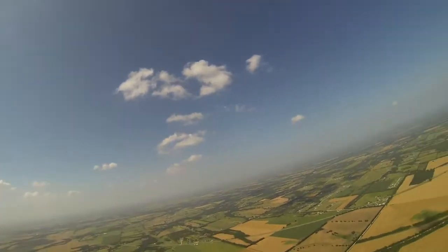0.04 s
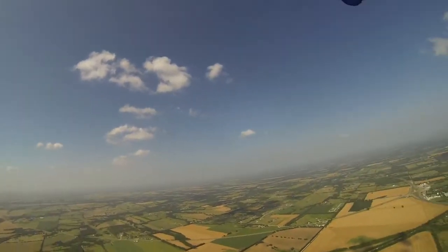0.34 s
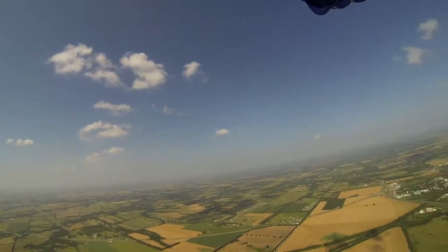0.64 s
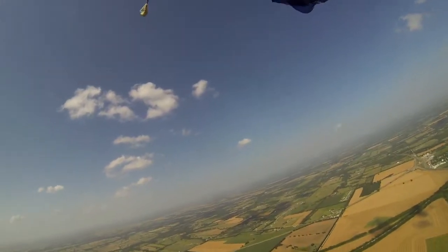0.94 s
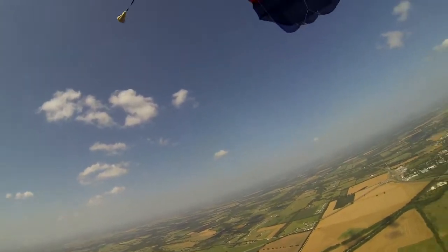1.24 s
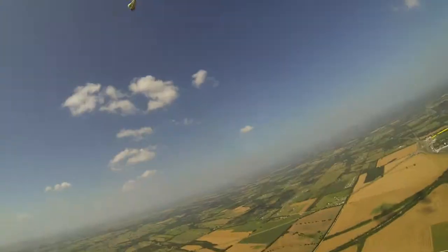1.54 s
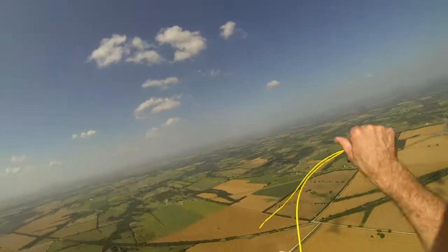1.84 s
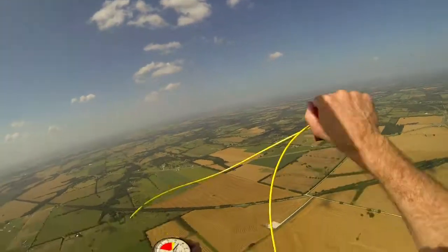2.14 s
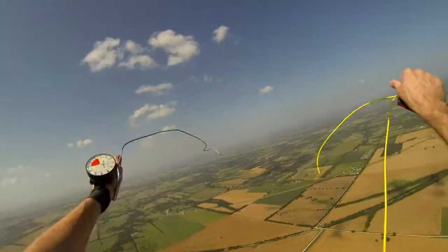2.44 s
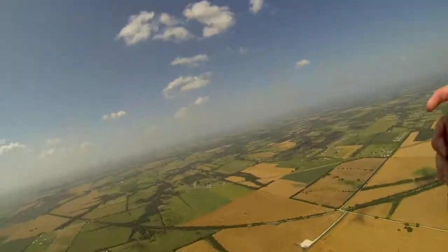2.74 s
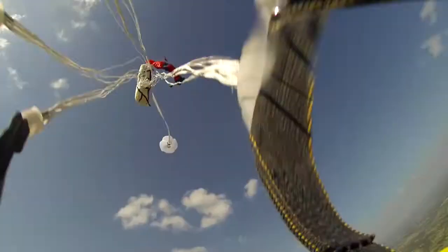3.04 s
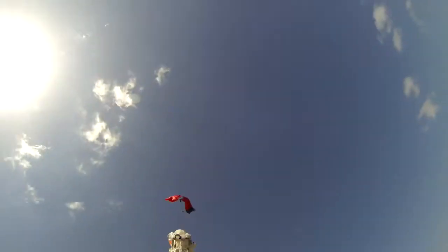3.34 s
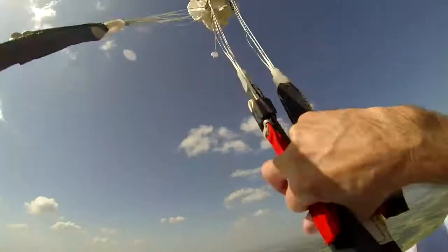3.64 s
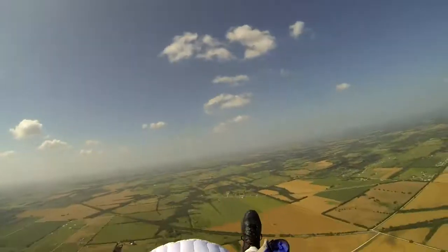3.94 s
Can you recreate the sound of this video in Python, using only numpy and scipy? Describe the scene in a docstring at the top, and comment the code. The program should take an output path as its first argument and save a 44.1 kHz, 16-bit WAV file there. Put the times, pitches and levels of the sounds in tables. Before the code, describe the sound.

Wind buffets a skydiver's microphone in uneven gusts over a low hum. Straps and cables snap sharply and cloth rustles as one parachute is cut away, then a quick run of cracks comes as the next opens.

```python
"""Wind on a skydiver's camera

One parachute is cut away and the next opens. Turbulent air buffets the housing and drives its mount
into a hum; cloth flaps and rustles; straps, cables and rings strike with short cracks. The hollow
case colours the wind, rustles and cracks by resonance, and the hardest snaps overload the microphone."""
import sys
import numpy as np
from scipy import signal
from scipy.fft import rfft, irfft
from scipy.io import wavfile
from scipy.ndimage import uniform_filter1d

SR = 44100
rng = np.random.default_rng(int(sys.argv[2]) if len(sys.argv) > 2 else 0)


def bounce(signal):
    """Save signal as a 16-bit WAV file at the path given by the first command-line argument."""
    frames = np.transpose(np.atleast_2d(signal))
    limited = np.clip(frames, -1, 1)
    pcm = np.round(limited * 32767).astype(np.int16)
    wavfile.write(sys.argv[1], SR, pcm)


N = 176400
TIME = np.arange(N) / SR

# resonances of the hollow case: f/Hz, lift/dB
CASE_MODES = [(665, 5), (865, 4.5), (1290, 4), (1490, 4), (2100, 0), (2520, 3.5), (3400, 5), (3850, 9.5),
              (4950, 6.5), (6480, 3), (10360, 4.5)]
# course of the airflow, in relative levels: t/s, buffeting/dB, rush/dB, hiss/dB
AIRFLOW = [(0, -29.5, -31.5, -37.5), (0.13, -41.5, -43.5, -52.5), (0.3, -49, -49.5, -58),
           (0.55, -34, -31, -47.5), (0.61, -46.5, -56.5, -57.5), (0.82, -32, -31, -36),
           (0.96, -32.5, -36.5, -47), (1.13, -30.5, -27.5, -32.5), (1.215, -17, -33, -33.5),
           (1.29, -96, -54, -91), (1.42, -24.5, -62, -39), (1.47, -65, -72, -74), (1.75, -53, -60.5, -64.5),
           (1.79, -44.5, -47.5, -51), (2.06, -36.5, -48, -50.5), (2.15, -26, -41.5, -42.5),
           (2.22, -49, -57.5, -57.5), (2.38, -35, -43, -48), (2.45, -64, -72.5, -70), (2.84, -39, -43, -50),
           (2.91, -37, -51.5, -57), (3.03, -37.5, -43, -44.5), (3.27, -39, -47, -54),
           (3.55, -32, -41.5, -49), (3.7, -29, -31.5, -43.5), (4.0, -38.5, -41, -40.5)]
# spectra of the four bands of wind noise: f/Hz, relative density/dB
RUMBLE_SPECTRUM = [(12, 3.5), (40, 2.5), (80, -5), (180, -24), (700, -75)]
BUFFET_SPECTRUM = [(60, -21), (160, 4.5), (280, 2), (700, -12), (1100, -21.5), (5000, -68)]
RUSH_SPECTRUM = [(300, -31), (800, -14), (1250, 3), (1680, 1), (3000, -40.5), (15000, -58)]
HISS_SPECTRUM = [(800, -17.5), (1800, 3.5), (3700, -11), (4500, -18), (10500, -34.5), (15000, -43)]
# vibration of the mount driven by the air: t/s, level/dB
MOUNT_HUM = [(.78, -28), (.93, -17), (1.2, -30.5), (1.76, -28.5), (2.0, -18.5), (2.19, -12), (2.25, -32.5),
             (2.37, -13.5), (2.43, -36), (2.58, -30.5), (2.78, -19.5), (2.92, -17), (3.13, -31.5),
             (3.28, -18.5)]
# jerks of the harness that set the mount ringing: t/s, level/dB
HARNESS_JERKS = [(1.243, -12), (1.452, -15), (2.418, -13)]
# fabric, cables and lines rubbing: start t/s, level/dB, duration/s
RUBS = [(0.528, -43.5, 0.034), (0.791, -28, 0.008), (1.151, -36.5, 0.099), (1.414, -43.5, 0.024),
        (1.784, -51, 0.093), (2.059, -46.5, 0.014), (2.111, -43, 0.065), (2.201, -39.5, 0.0079),
        (2.281, -48.5, 0.02), (2.879, -38, 0.011), (3.426, -42.5, 0.047), (3.673, -39, 0.08)]
# spectrum of popping creases: f/Hz, relative density/dB
CREASE_SPECTRUM = [(400, -1.5), (2900, 0), (5000, -16), (10500, -24.5), (15000, -32.5)]
# flaps of loose cloth: centre t/s, level/dB, f/Hz, Gaussian width/s
CLOTH_FLAPS = [(1.207, -18.5, 1610, 0.019), (1.221, -5.5, 266, 0.0029), (1.414, -11, 91, 0.0096),
               (2.149, -25.5, 378, 0.0033), (3.702, -21.5, 285, 0.019), (3.772, -28.5, 1460, 0.0031),
               (3.857, -20.5, 483, 0.0064), (3.963, -28.5, 1350, 0.013)]
# vortices hitting the microphone: t/s, signed peak pressure/full scale, time constant/s
VORTICES = [(0.0664, -0.46, 0.0028), (0.089, 0.73, 0.009), (0.266, -0.91, 0.0054), (0.554, -1.08, 0.0037),
            (1.221, -1.65, 0.0017), (1.429, -0.33, 0.0011), (1.434, 0.9, 0.0031), (2.403, 1.5, 0.0022),
            (2.411, -0.77, 0.0021), (2.89, 0.59, 0.0033)]
# knocks on a piece of hardware, perhaps a harness ring: t/s, level/dB
HARDWARE_KNOCKS = [(3.0815, -28.5), (3.1346, -30.5)]
# impacts of straps, cables and rings: t/s, level/dB, decay/s, treble shelf/dB, resonance f/Hz
IMPACTS = [(.0657, 8.5, 0.00079, -6, 1204), (0.1094, -19, 0.0017, -12, 1610),
           (0.1657, -21.5, 0.0014, -31, 1710), (0.2653, -19, 0.0019, -6.5, 1310),
           (0.579, -20, 0.0084, -4, 1650), (0.6741, -24.5, 0.0019, 19, 3430),
           (1.2251, 9.5, 0.0021, -2, 1710), (1.2552, -5, 0.0029, -6.5, 850),
           (1.3315, -22.5, 0.0032, -5.5, 2740), (1.394, -25.5, 0.0024, -5, 2100),
           (1.506, -36.5, 0.001, -9.5, 2480), (1.538, -34.5, 0.0019, -6, 2486),
           (1.84, -14.5, 0.0036, -4, 2207), (1.9522, -17, 0.0029, -10.5, 2210),
           (1.9626, -7.5, 0.0027, -13.5, 2480), (2.402, -4, 0.00018, -9, 400),
           (2.811, -25, 0.0021, -13, 2290), (2.926, -21, 0.0022, -8.5, 2300),
           (2.9423, -5.5, 0.0027, -5.5, 527), (2.9584, -11, 0.0057, -11.5, 2005),
           (2.9836, 2, 0.0031, 8, 1370), (2.9936, -8, 0.0038, 6.5, 1560), (3.009, -12.5, 0.0031, 3.5, 1850),
           (3.0421, -17, 0.0028, 6.5, 2640), (3.0806, 4, 0.001, 6, 695), (3.0862, -8.5, 0.0017, 3, 1640),
           (3.44, -18.5, 0.0044, -7.5, 2400)]
# spectrum common to the impacts: f/Hz, relative density/dB
IMPACT_SPECTRUM = [(60, -20), (250, 4.5), (650, 1), (1020, 0.5), (1550, 6.5), (2500, 0.5), (5500, -15),
                   (15000, -28.5)]


def from_db(db):
    """Amplitude ratio: a factor of ten for every 20 dB."""
    return 10 ** (np.asarray(db) / 20)


def unit_rms(x):
    """Normalisation to a root-mean-square value of one."""
    return x / np.sqrt(np.mean(x ** 2) + 1e-20)


def in_time(rows):
    """Linear interpolation of each column of a time table at every sample."""
    times, *columns = np.transpose(rows)
    return [np.interp(TIME, times, column) for column in columns]


def add(out, start, sound):
    """Superposition of a sound from its start time on."""
    i = max(int(start * SR), 0)
    out[i:i + len(sound)] += sound[:N - i]


def drift(corner_hz):
    """Random fluctuation of about unit rms: white noise through a two-pole low-pass."""
    step, settling = 40, 2000
    pole = np.exp(-2 * np.pi * step * corner_hz / SR)
    noise = rng.standard_normal(N // step + settling + 2)
    slow = unit_rms(signal.lfilter([1], [1, -2 * pole, pole * pole], noise)[settling:])
    return np.interp(np.arange(N) / step, np.arange(len(slow)), slow)


def through_case(x, spectrum, colour=lambda hz: 0):
    """Source and filter: spectrum, colour and case resonances add in dB to a minimum-phase response."""
    n = len(x)
    hz = np.maximum(np.arange(n // 2 + 1) * SR / n, 1)
    corners, levels = np.transpose(spectrum)
    db = np.interp(np.log(hz), np.log(corners), levels) + colour(hz)
    for centre, lift in CASE_MODES:
        width_hz = 84 * np.sqrt(centre / 1000)
        db += lift * np.exp(-((hz - centre) / width_hz) ** 2)
    cepstrum = irfft(np.log(from_db(db)), n)
    cepstrum[1:n // 2] *= 2  # folding the cepstrum makes the filter causal
    cepstrum[n // 2 + 1:] = 0
    return irfft(rfft(x) * np.exp(rfft(cepstrum)), n)


def struck_mode(knocks, hz, t60_s):
    """Free vibration of a damped mode: the imaginary part is its motion, the magnitude its amplitude."""
    out = np.zeros(N, complex)
    for start, db in knocks:
        add(out, start, from_db(db - 60 * TIME / t60_s) * np.exp(2j * np.pi * hz * TIME))
    return out


def air_noise(spectrum, level_db, rough_db, eddy_hz):
    """Amplitude modulation: small eddies roughen a band of flow noise heard through the case."""
    noise = through_case(rng.standard_normal(N), spectrum)
    return from_db(level_db) * unit_rms(noise * from_db(rough_db * drift(eddy_hz)))


def wind():
    """Turbulence: shared gusts modulate four noise bands; the rumble partly follows the buffeting."""
    buffet_db, rush_db, hiss_db = in_time(AIRFLOW)
    gust_db = 3.5 * np.tanh(drift(corner_hz=34))
    rumble = unit_rms(through_case(rng.standard_normal(N), RUMBLE_SPECTRUM))
    rumble *= from_db(0.66 * buffet_db + 2 + gust_db)
    buffet = air_noise(BUFFET_SPECTRUM, buffet_db - 1 + gust_db, rough_db=3, eddy_hz=82)
    rush = air_noise(RUSH_SPECTRUM, rush_db - 2 + 0.2 * gust_db, rough_db=1.2, eddy_hz=120)
    hiss = air_noise(HISS_SPECTRUM, hiss_db - 1 + 0.27 * gust_db, rough_db=4, eddy_hz=170)
    return rumble + buffet + rush + hiss


def mount(natural_hz=55.7, t60_s=0.6, wander_hz=3.5, wobble_db=3):
    """Forced and free vibration: air drives an unsteady hum; after a jerk it rings at a steady pitch."""
    hum_db, = in_time(MOUNT_HUM)
    forced = np.sqrt(2) * from_db(hum_db + wobble_db * drift(9.6))
    free = np.abs(struck_mode(HARNESS_JERKS, natural_hz, t60_s))
    free = uniform_filter1d(free, int(SR / natural_hz))  # builds up over one cycle
    amplitude = np.hypot(forced, free)
    hz = natural_hz + wander_hz * drift(13.9) * forced / amplitude
    return amplitude * np.sin(2 * np.pi * np.cumsum(hz) / SR)


def rustles(creases_per_s=3000, spread_db=4.5, edge_s=0.003):
    """Shot noise: creases pop at random while fabric or cable slides; rubs start and stop abruptly."""
    sizes = from_db(spread_db * np.minimum(rng.exponential(1, N), 4)) * rng.choice([-1, 1], N)
    pops = sizes * (rng.random(N) < creases_per_s / SR)
    envelope = np.zeros(N)
    for start, db, duration in RUBS:
        t = TIME - start
        envelope += from_db(db) * 0.5 * (np.tanh(t / edge_s) - np.tanh((t - duration) / edge_s))
    return envelope * unit_rms(through_case(pops, CREASE_SPECTRUM))


def flutters(edge_ratio=1.23):
    """Narrow-band noise: each flap of loose cloth swells and fades under a Gaussian envelope."""
    out = np.zeros(N)
    for centre, db, hz, width in CLOTH_FLAPS:
        band = signal.butter(2, [hz / edge_ratio, hz * edge_ratio], "band", fs=SR, output="sos")
        envelope = np.exp(-0.5 * ((TIME - centre) / width) ** 2)
        burst = envelope * signal.sosfilt(band, rng.standard_normal(N))
        out += from_db(db) * burst * np.sqrt(np.sum(envelope ** 2) / np.sum(burst ** 2))
    return out


def air_slaps(tip_s=0.00029):
    """Pressure pulses: each vortex gives an exponential rise and fall, slightly rounded at the tip."""
    return sum(pressure * np.exp((tip_s - np.hypot(TIME - centre, tip_s)) / decay)
               for centre, pressure, decay in VORTICES)


def hardware_ring():
    """Free vibration: a knocked piece of hardware sings on in one lightly damped mode."""
    return struck_mode(HARDWARE_KNOCKS, hz=659, t60_s=0.3).imag


def snaps(body_hz=800, treble_hz=3920, resonance_db=7, log_width=0.2):
    """Impact excitation: a brief crack, coloured by the part that strikes, rings through the case."""
    out, t = np.zeros(N), TIME[:4096]
    for start, db, decay, treble_db, resonance_hz in IMPACTS:
        def colour(hz):
            """Two shelves and the part's resonance, in dB; harder snaps have slightly less bass."""
            body = -0.04 * db / (1 + (hz / body_hz) ** 4)
            treble = treble_db / (1 + (treble_hz / hz) ** 6)
            resonance = resonance_db * np.exp(-(np.log(hz / resonance_hz) / log_width) ** 2)
            return body + treble + resonance
        rise = 0.31 * decay  # longer cracks start more softly
        envelope = (1 - np.exp(-t / rise)) * np.exp(-t / decay)
        crack = through_case(envelope * rng.choice([-1, 1], len(t)), IMPACT_SPECTRUM, colour)
        energy = 0.5 * decay * SR  # that of a unit exponential decay
        add(out, start, from_db(db) * crack * np.sqrt(energy / np.sum(crack ** 2)))
    return out


def scene():
    """Superposition of air, mount, rigging and cloth at one microphone."""
    return (wind() + mount() + air_slaps() + snaps() + hardware_ring() + flutters() + rustles())[None]


def record(dry):
    """Saturation and band limiting: the microphone loses the deepest bass, clips softly and cuts treble."""
    x = signal.sosfilt(signal.butter(1, 12, "high", fs=SR, output="sos"), dry)
    x = x / (1 + x ** 8) ** (1 / 8)  # overload
    x = signal.sosfilt(signal.butter(2, 11990, fs=SR, output="sos"), x)
    return signal.sosfilt(signal.cheby2(12, 70, 16600, fs=SR, output="sos"), x)


dry = scene()
out = record(dry)
bounce(out)
```